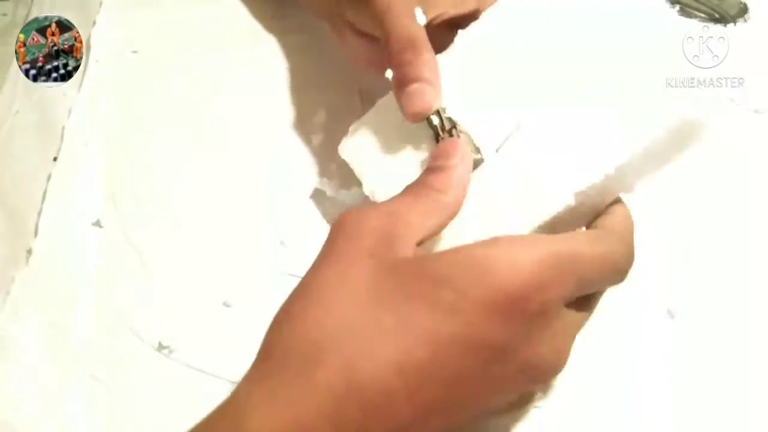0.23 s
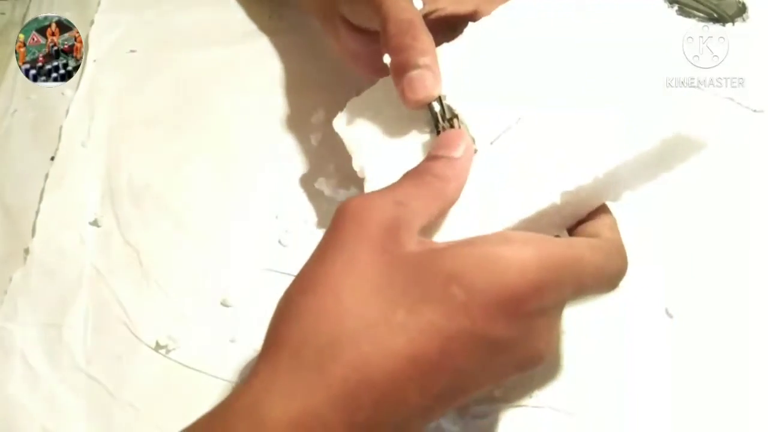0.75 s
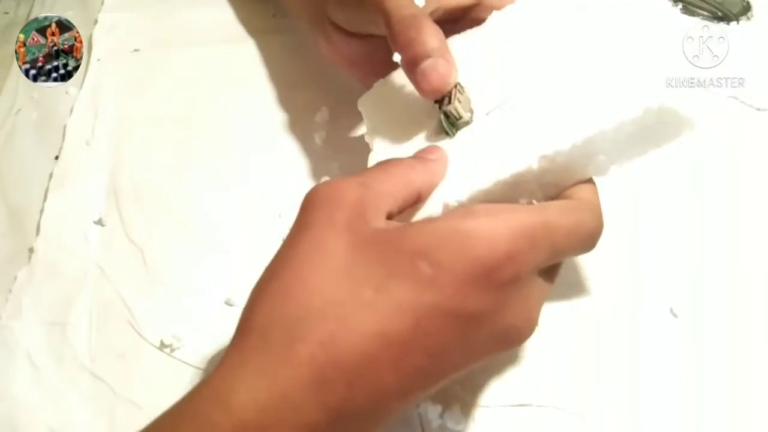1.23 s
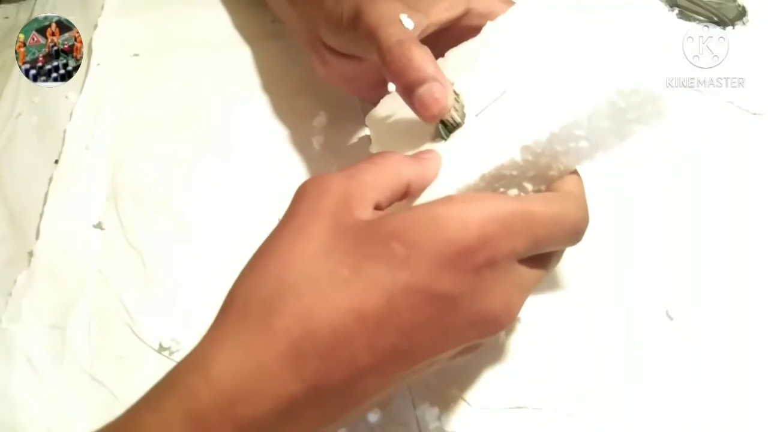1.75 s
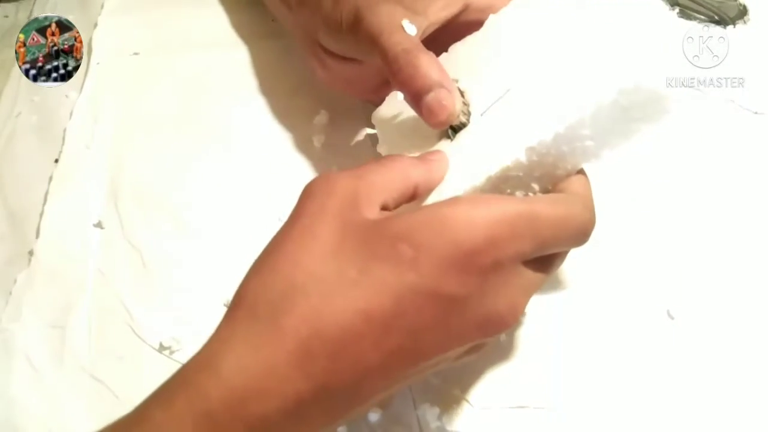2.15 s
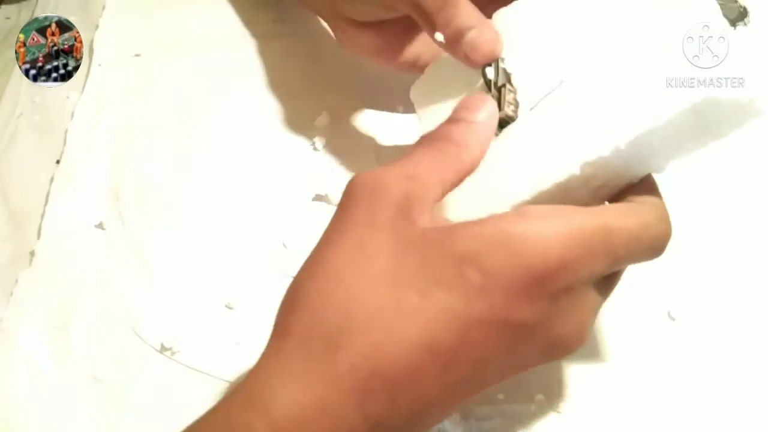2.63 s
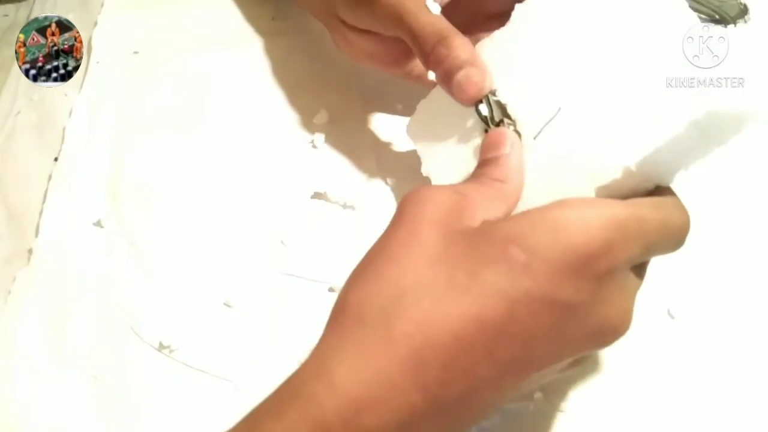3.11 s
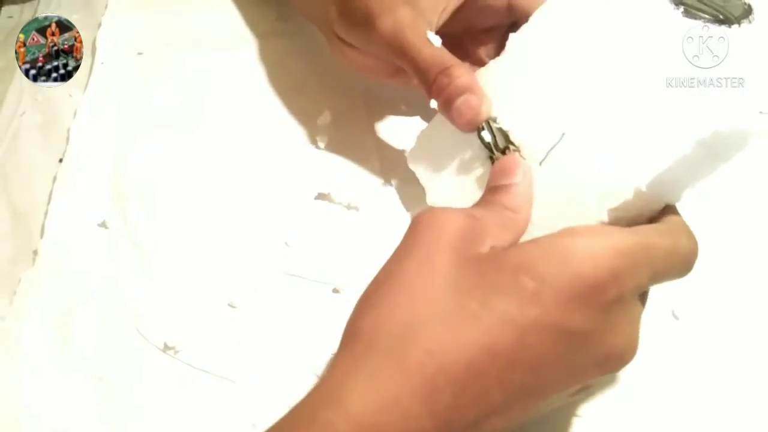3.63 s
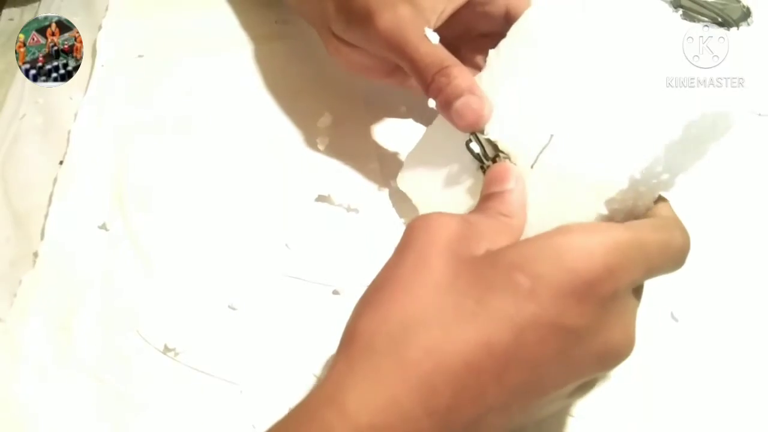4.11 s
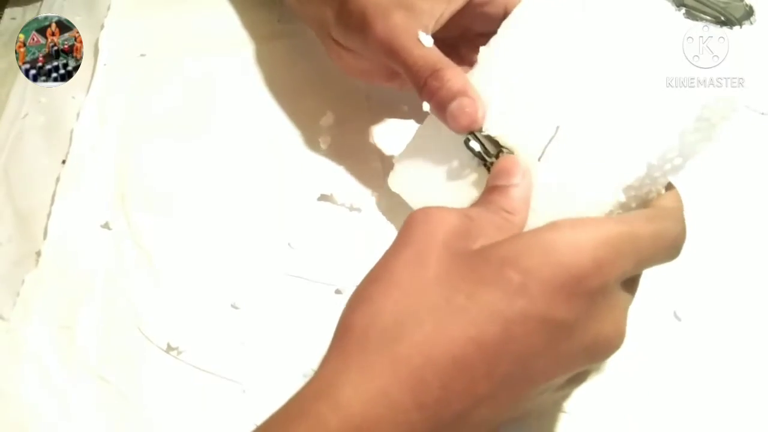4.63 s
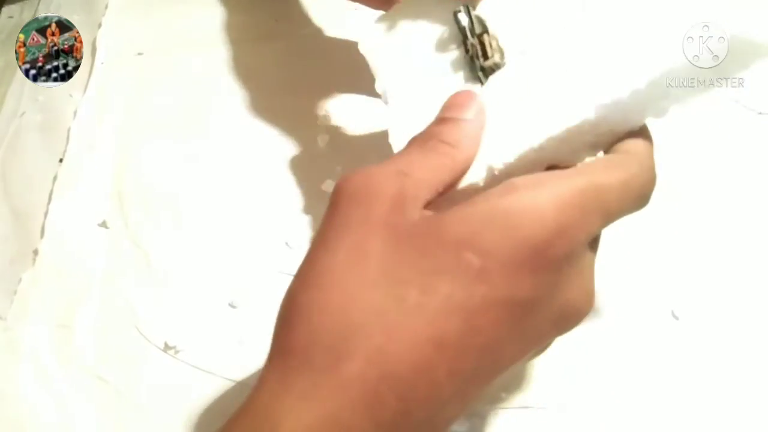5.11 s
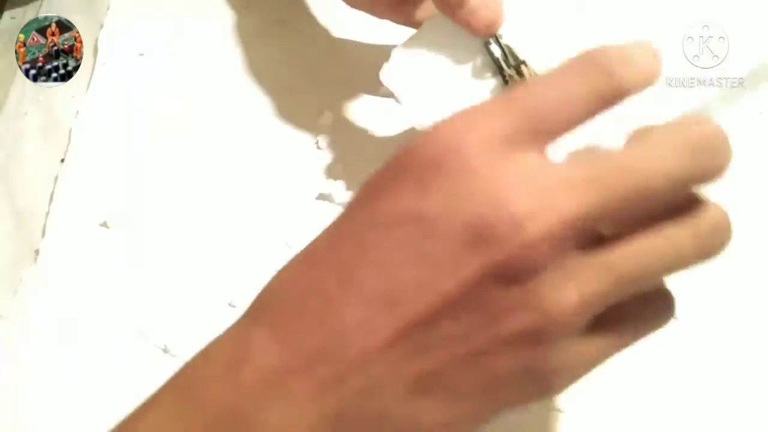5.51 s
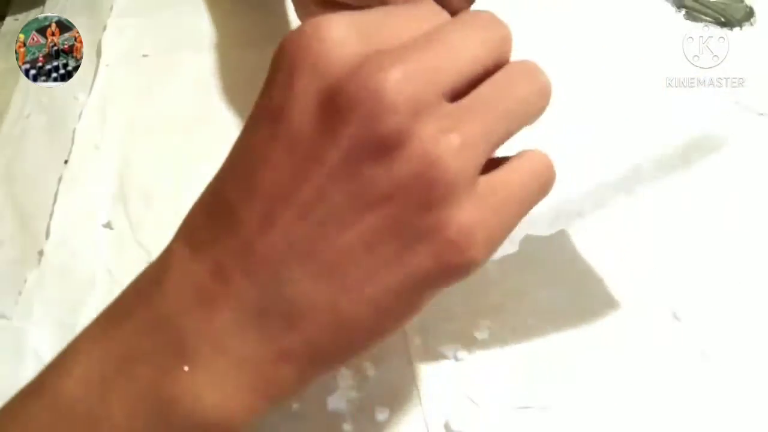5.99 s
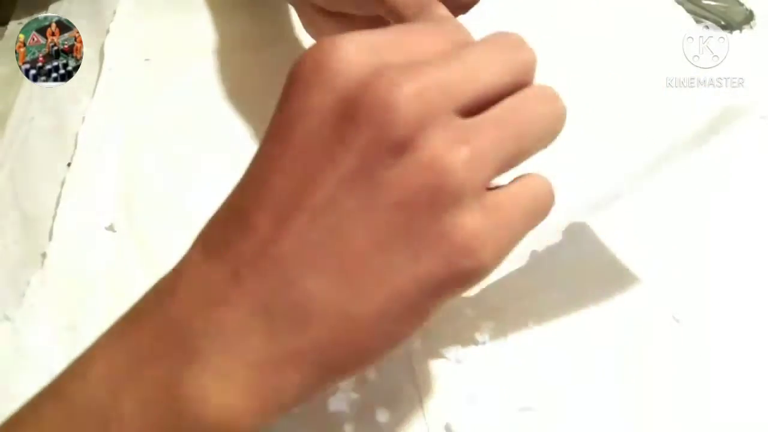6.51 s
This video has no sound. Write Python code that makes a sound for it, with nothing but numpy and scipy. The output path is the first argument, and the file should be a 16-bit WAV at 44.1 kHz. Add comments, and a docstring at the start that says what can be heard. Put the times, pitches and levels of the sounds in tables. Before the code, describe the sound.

Polystyrene foam is scraped and cut close to a stereo microphone in a small room. Quiet gritty rubs open, then a cluster of sharp cracks under one second. The loudest snap comes near one and a half seconds, with more cracks and a thin, broken, falling squeal. Afterwards come a stuttering judder, sparse soft scrapes, hollow rubs and one firmer scratch at the end, over low rumble and faint hiss.

```python
"""Polystyrene foam, scraped and cut with a blade, close to a microphone with two ports.
Each stroke is a rush of tiny cell ruptures that swells, eases off and leaves a trail of crumbs; at times it judders.
Whole beads snap as sharp cracks, and the slab rings hollow as filtered rubbing noise.
The foam squeals in spurts of one sinking tone; faint, fuzzy falling squeaks come now and then.
Behind it, a small room adds a short tail of noise, over a low rumble and a thin hiss of shaped noise."""
import sys
import numpy as np
from scipy import signal
from scipy.fft import rfft, irfft
from scipy.io import wavfile
from scipy.ndimage import uniform_filter1d

SR = 44100
rng = np.random.default_rng(int(sys.argv[2]) if len(sys.argv) > 2 else 0)


def put_to_file(sound):
    """Save the sound as 16-bit audio at rate SR, in the file named by the first command-line argument."""
    columns = np.atleast_2d(sound).T  # one column per channel
    safe = np.clip(columns, -1, 1)
    whole_steps = np.round(safe * 32767)
    wavfile.write(sys.argv[1], SR, whole_steps.astype(np.int16))


N = 297675

# Colour of the room rumble: (frequency [Hz], relative level [dB])
RUMBLE_COLOUR = [(26, -39), (61, -23.5), (81, -14), (96, 4.5), (132, -10.5), (192, -4), (252, 1.5),
                 (335, -5), (610, -15.5), (1020, -15), (1400, -35), (3400, -35), (5900, -48.5)]
# Colour of the thin hiss: (frequency [Hz], relative level [dB])
HISS_COLOUR = [(2500, -13.5), (3700, -15.5), (4500, -2.5), (6200, -6.5), (7500, 7), (8200, -4),
               (9300, -20.5), (11000, -47.5), (15000, -69)]
# Faint squeaks sliding down toward one resting pitch: (start [s], length [s], level [dB], first pitch [Hz])
CHIRPS = [(.935, .075, -62, 3050), (1.06, .11, -69, 3100), (2.45, .07, -66, 3300), (2.595, .055, -63, 3050),
          (3.79, .13, -60, 4400), (4.395, .075, -58, 3300), (6.47, .08, -70, 3200)]
# Spurts of stick-slip squeal: (start [s], end [s], level [dB])
SQUEAL_SPURTS = [(1.195, 1.34, -65), (1.328, 1.47, -51), (1.49, 1.632, -50), (1.645, 1.765, -51),
                 (1.765, 1.815, -61), (1.81, 1.89, -53)]
# Squeal pitch, dropping quickly at first, then sinking unevenly: (time [s], pitch [Hz])
SQUEAL_PITCH = [(1.195, 6000), (1.225, 5500), (1.25, 5410), (1.33, 5340), (1.42, 5150), (1.52, 5110),
                (1.7, 4860), (1.81, 4530), (1.9, 4450)]
# Hollow rings of the slab: (crest [s], length [s], level [dB], pitch [Hz])
HOLLOWS = [(0.06, 0.16, -62.5, 1063), (0.036, 0.095, -59, 2780), (1.493, 0.097, -56.5, 260),
           (1.68, 0.076, -59.5, 245), (2.148, 0.069, -60, 270.6), (2.5, 0.09, -62.5, 1024),
           (4.475, 0.051, -52, 3920), (3.115, 0.11, -59.5, 2222), (4.555, 0.083, -59, 962),
           (4.578, 0.087, -55, 2610), (4.722, 0.12, -58.5, 2700), (4.983, 0.19, -73.5, 980),
           (5.135, 0.13, -54, 1486), (5.138, 0.19, -64, 3970), (5.152, 0.12, -65, 654),
           (5.365, 0.074, -56.5, 187), (6.599, 0.091, -51, 1161), (6.594, 0.098, -57.5, 255.5)]
# Beads that snap: (time [s], relative level [dB], body [dB], left over right [dB])
BEADS = [(0.146, -47.5, 8, -3), (0.2118, -49, 4, -3), (0.269, -50, 3, -2.5), (.305, -52, 0, -2.5),
         (0.644, -23.5, -5, -2), (0.687, -40, 2, 1), (0.713, -38, 6, -5), (0.7894, -23.5, 6, -13),
         (0.803, -30, -16, 3.5), (0.814, -25, -3, -10), (0.854, -22.5, -10.5, -10), (1.206, -54, 2, -1.5),
         (1.343, -46, 6, -2.5), (1.4249, -10.5, 2.5, 4), (1.487, -28.5, -9, -2.5), (1.539, -22.5, -13, -5),
         (1.5986, -17.5, -6.5, -3.5), (1.678, -17.5, -3.5, -2), (1.8192, -40, 7, -11),
         (1.857, -24.5, -9, -3), (1.8788, -20.5, -10, -4), (1.9023, -26.5, -2.5, -5),
         (2.159, -28.5, -7, -1.5), (3.381, -44, -6.5, -3), (3.409, -47, -10, -4.5), (3.4463, -42, -5.5, -3),
         (3.787, -44, 8, -5.5), (3.858, -48, 0.5, -16), (3.972, -52.5, 5, -1), (4.127, -47, 8, -4.5),
         (4.434, -43, -3, -7.5), (4.494, -47, 16, -2), (4.543, -51, 16, -4), (4.579, -43, 9, -18),
         (5.11, -39, 6, -3.5), (4.777, -35.5, -46, -10), (5.7923, -41, -5.5, -7)]
# Colour of a snap: (frequency [Hz], relative level [dB])
SNAP_COLOUR = [(62, -56), (250, -18), (560, -10.5), (1100, -2.5), (1500, 4), (2100, -2), (2850, 1.5),
               (5000, 8.5), (6600, 3.5), (7900, -3), (9200, -11.5), (14400, -12.5), (15900, -25)]
# Strokes: (start [s], length [s], relative level [dB], hollow body [dB], bright edge [dB], left over right [dB])
STROKES = [(0.02, 0.054, -41, 7.5, -0.5, -4.5), (0.113, 0.072, -55.5, 14, 2.5, -1.5),
           (0.183, 0.087, -57.5, 13, 4, -3.5), (0.508, 0.045, -51.5, 15.5, -1, -6),
           (0.568, 0.025, -46, 6.5, -1, -2), (0.597, 0.058, -38, 9.5, 3, -4),
           (0.677, 0.039, -32.5, 1.5, -8, -2.5), (0.739, 0.031, -45, 21, 15, -10),
           (0.791, 0.084, -33, 1, -4.5, -2), (0.841, 0.026, -32.5, -2, 2.5, -4),
           (1.014, 0.05, -45, 5, 1.5, -3), (1.22, .2, -63, 10, -2, -3.5), (1.456, 0.045, -36, -2.5, 6, -2),
           (1.56, .032, -40, -7, 3, -2.5), (1.808, 0.021, -42, 2.5, -5, -2.5),
           (1.833, 0.072, -38.5, 6.5, 4.5, -4.5), (1.976, 0.052, -48.5, -4.5, 6, -3.5),
           (2.09, 0.036, -45, -0.5, -8, -4), (2.132, 0.037, -36.5, 4.5, 5, -2.5),
           (2.288, 0.036, -47.5, 21, 3, -2), (2.474, 0.1, -48.5, 6.5, -6.5, -2.5),
           (3.052, 0.11, -52.5, 9, -3, -2.5), (3.373, 0.1, -56.5, -9.5, -2, -0.5),
           (3.68, 0.038, -43, 0, -1, -2), (3.711, 0.11, -57, 17, -4, -8.5),
           (3.814, 0.11, -54.5, 5.5, -2.5, -3.5), (4.36, 0.033, -52, 20.5, 5, -3),
           (4.441, 0.066, -41, 2.5, -10.5, -3), (4.524, 0.07, -48, 18, 8.5, -2.5),
           (4.585, 0.0916, -60, 34, 8, -14), (4.665, 0.14, -50.5, 13, 1.5, -5),
           (4.771, 0.032, -47.5, 21, 22, -12), (4.898, 0.12, -63.5, 20, 7, -3.5),
           (5.013, 0.056, -50, 9, 3.5, -4.5), (5.073, 0.077, -44.5, 11, -2.5, -3.5),
           (5.116, 0.078, -52.5, 35, -9, -7.5), (5.194, 0.034, -52.5, 20, 16, -3.5),
           (5.529, 0.02, -49, -6, -0.5, -1.5), (5.752, 0.028, -55, 3, -6, -2.5),
           (6.323, 0.039, -47.5, 12.5, 2.5, -3.5), (6.352, 0.016, -39, -24.5, -5.5, -2.5),
           (6.554, 0.062, -34, -1, -4.5, -3)]
# Colour of a stroke: (frequency [Hz], relative level [dB])
STROKE_COLOUR = [(62, -19), (135, -15), (265, -6.5), (460, -11), (720, -13.5), (1000, -11), (1850, 0),
                 (2750, -3.5), (4700, 2), (6900, -2), (8100, -4.5), (9400, -19), (14400, -26.5),
                 (15900, -50.5)]
# The foam catches and chatters: (start [s], end [s], time between slips [s], relative level of first slip [dB])
JUDDERS = [(2.656, 2.70, 0.028, -32.5), (2.741, 2.83, 0.034, -41.5), (2.853, 2.9, .032, -47),
           (2.928, 2.985, 0.036, -42)]
# Slab resonances and dips in strokes and snaps: (frequency [Hz], width [Hz], lift [dB])
SLAB_MODES = [(1043.5, 76.5, 7.5), (2730, 190, 6), (3053, 67, -6.5), (3302, 200, 4.5), (4060, 600, 1),
              (4250, 280, -1)]
# Phase between the microphone ports: (frequency [Hz], lead of left [rad])
PORT_PHASE = [(110, -1), (400, 1), (900, 1.11), (1250, -0.5), (1900, -2.5), (2600, 0.5), (4500, 0.1),
              (8000, -1.86)]
# How alike the ports hear a rupture: (frequency [Hz], likeness [0 to 1])
PORT_LIKENESS = [(110, 0.45), (1100, 0.96), (1800, 0.86), (2400, 0.13), (3600, 0.16), (7100, 0.083),
                 (14000, .2)]
# How strongly the left-right difference shows: (frequency [Hz], factor on its dB [ratio])
PORT_SHADOW = [(110, 3), (720, 1.03), (1450, 0), (2600, 3.5), (4600, 3), (7100, 1.24), (10500, 0)]

# Pan of the ticks, slips and tears, before the port shadow
LOOSE_PAN_DB = -2
# Loose crumbs tick at random during strokes above TICK_DB
TICKS_PER_S, TICK_DB, TICK_SPREAD_DB, TICK_BODY_DB = 40, -52, 2.2, -3
# Softer beads crumble, then turn dull: thresholds in dB, slopes in dB per dB below them
CRISP_DB, CRUMBLE_SLOPE = -16, 0.55
BRIGHT_DB, DULLING_SLOPE = -28.5, 0.36
# Snaps above TEAR_ABOVE_DB are wrapped in a bright fizz, its level given against the snap's table level
TEAR_ABOVE_DB, TEAR_LEAD_S, TEAR_S = -23.5, 0.025, 0.068
TEAR_DB, TEAR_BODY_DB, TEAR_EDGE_DB = -31.5, 12, 13
# Later slips of a judder share CHATTER_DB
SLIP_S, CHATTER_DB, SLIP_BODY_DB, SLIP_EDGE_DB = 0.018, -47.5, -3, -9.5
# Every stroke bites, swells to its middle and lets go over shares of its length
BITE_SHARE, ARCH_DB, RELEASE_SHARE = 0.14, 11, 0.26
# Crumbs rustle before and after it
CRUMBS_DB, CRUMBS_LEAD_S, CRUMBS_TRAIL_S = -24, 0.019, 0.06
# Strokes lighter than DENSE_DB tear fewer cells and sound grittier (slope in dB per dB)
DENSE_DB, THINNING_SLOPE = -44, 0.55


def amp(db):
    """Decibels to gain."""
    return 10 ** (np.asarray(db) / 20)


def unit(x):
    """Scales to rms 1."""
    return x / np.sqrt(np.mean(x ** 2) + 1e-20)


def read(points, hz):
    """Joins points on a log-frequency axis."""
    f, value = np.transpose(points)
    return np.interp(np.log(hz + 1), np.log(f + 1), value)


def pan(db):
    """Left and right gains, db apart."""
    return amp([[db / 2], [-db / 2]])


def add(mix, s, sound):
    """Mixes a stereo sound in at time s."""
    start = round(s * SR)
    part = mix[:, max(start, 0):max(start + sound.shape[1], 0)]
    part += sound[:, max(-start, 0):][:, :part.shape[1]]


def shelf(hz, corner_hz, order=4):
    """Rises from 0 below the corner to 1 above it."""
    return 1 - 1 / (1 + (hz / corner_hz) ** order)


def wobble(seconds):
    """Random drift of rms 1 that changes over about the given time."""
    pole = np.exp(-1 / (seconds * SR))
    return unit(signal.lfilter([1], [1, -pole], rng.standard_normal(N)))


def causal(db, size=4096):
    """Minimum-phase spectrum with the given gain."""
    cepstrum = irfft(np.log(amp(db)))
    cepstrum[1:size // 2] *= 2
    cepstrum[size // 2 + 1:] = 0
    return np.exp(rfft(cepstrum))


def evened(spectrum, width_hz=450):
    """Levels out broad humps and holes, keeping the fine ripple."""
    bins = max(round(width_hz * 2 * len(spectrum) / SR), 1)
    power = uniform_filter1d(abs(spectrum) ** 2, bins)
    return spectrum * causal(-10 * np.log10(power + 1e-9))


def steady(colour, db, likeness, pan_db):
    """Even noise, partly shared by both ports."""
    shared, left, right = rng.standard_normal((3, N))
    noise = np.sqrt(likeness) * shared + np.sqrt(1 - likeness) * np.array([left, right])
    gain = amp(read(colour, np.fft.rfftfreq(N, 1 / SR)))
    shaped = irfft(rfft(noise) * gain, N)
    return amp(db) * unit(shaped) * pan(pan_db)


def rumble():
    """Low room noise that reaches both ports much alike."""
    return steady(RUMBLE_COLOUR, db=-68.5, likeness=0.72, pan_db=-3)


def hiss():
    """Thin high noise, nearly independent in the two ports."""
    return steady(HISS_COLOUR, db=-64.5, likeness=0.024, pan_db=-2.5)


def room(near, t60=0.16, wet_db=-17, build_s=0.004):
    """Short tail of a small room: noise that builds up, then decays by 60 dB in t60 seconds."""
    t = np.arange(SR // 2) / SR
    decay = np.exp(-np.log(1000) * t / t60)
    tail = rng.standard_normal((2, len(t))) * decay * (1 - np.exp(-t / build_s))
    tail /= np.linalg.norm(tail, axis=1, keepdims=True)
    return amp(wet_db) * signal.fftconvolve(near, tail, axes=1)[:, :N]


def chirps(rest_hz=2520, glide_share=0.4, jitter=0.048, flutter_db=2.5, pan_db=-4):
    """Faint, fuzzy squeaks now and then: jittered tones that stutter, slide downward and level off."""
    out, waver = np.zeros((2, N)), wobble(0.0004)
    flutter = amp(flutter_db * unit(uniform_filter1d(wobble(0.004), 60)))
    for s, length, db, top_hz in CHIRPS:
        at = np.arange(round(s * SR), round((s + length) * SR))
        u = np.linspace(0, 1, len(at))
        glide = rest_hz + (top_hz - rest_hz) * np.exp(-u / glide_share)
        tone = np.sin(2 * np.pi * np.cumsum(glide * (1 + jitter * waver[at])) / SR)
        out[:, at] += amp(db) * np.sin(np.pi * u) * flutter[at] * tone * pan(pan_db)
    return out


def squeal(pan_db=-6, left_lead_rad=-1.2, fade_s=0.0098):
    """Fast stick-slip: one thin, unsteady tone that sinks as the stroke slows."""
    t = np.arange(N) / SR
    hz = np.interp(t, *np.transpose(SQUEAL_PITCH))
    waver = 0.009 * wobble(0.0007)
    flutter_db = 3.2 * uniform_filter1d(wobble(0.004), 60)
    phase = 2 * np.pi * np.cumsum(hz * (1 + waver)) / SR
    level = np.zeros(N)
    for start, end, db in SQUEAL_SPURTS:
        fade = np.clip(np.minimum(t - start, end - t) / fade_s, 0, 1)
        level += amp(db + flutter_db) * fade
    return np.sqrt(2) * level * np.sin([phase + left_lead_rad, phase]) * pan(pan_db)


def swell(crest, rise, fall, edge_db=12):
    """The samples around a crest, and a bell that is edge_db down at -rise and +fall."""
    at = np.arange(max(round((crest - 2 * rise) * SR), 0), min(round((crest + 2 * fall) * SR), N))
    t = at / SR - crest
    return at, amp(-edge_db * (t / np.where(t < 0, rise, fall)) ** 2)


def hollows(pan_db=-5, grain_db=2.5, grain_s=0.006, wander=0.012, wander_s=0.03):
    """Uneven rubbing noise drives one broad, wandering resonance of the slab; higher ones are wider."""
    out, drift = np.zeros((2, N)), wobble(wander_s)
    rubbing = rng.standard_normal(N) * amp(grain_db * wobble(grain_s))
    for crest, length, db, hz in HOLLOWS:
        at, bell = swell(crest, rise=0.44 * length, fall=0.56 * length)
        width_hz = 120 + 0.029 * hz
        pole = np.exp(-np.pi * width_hz / SR)
        # shift the noise down, low-pass it twice and shift it back: a resonance whose pitch can move
        turn = np.exp(2j * np.pi * np.cumsum(hz * (1 + wander * drift[at])) / SR)
        ring = (turn * signal.lfilter([1], np.poly([pole, pole]), rubbing[at] / turn)).real
        out[:, at] += amp(db) * unit(ring * bell) * np.sqrt(np.mean(bell ** 2)) * pan(pan_db)
    return out


def foam(db_of, pan_db, ring_s, ring_db, crack=(1,), size=4096):
    """What both ports hear of one rupture: a broad crack and a brief dense ring, new at each call."""
    t, hz = np.arange(size) / SR, np.fft.rfftfreq(size, 1 / SR)
    ring = rng.standard_normal((2, size)) * np.exp(-t / ring_s)
    right, other = rfft(ring / np.linalg.norm(ring, axis=1, keepdims=True))
    right = (1 + amp(ring_db) * right) / np.hypot(1, amp(ring_db))
    same = read(PORT_LIKENESS, hz)
    left = same * right + np.sqrt(1 - same ** 2) * other
    left, right = (evened(port * rfft(crack, size)) for port in (left, right))
    left = left * np.exp(1j * read(PORT_PHASE, hz))
    side_db = pan_db * read(PORT_SHADOW, hz) / 2
    slab_db = sum(lift / (1 + (2 * (hz - f) / width) ** 2) for f, width, lift in SLAB_MODES)
    ports = np.array([left * amp(side_db), right * amp(-side_db)])
    response = irfft(ports * causal(db_of(hz) + slab_db))
    # a millisecond of delay leaves room for one port to hear it before the other
    response = np.roll(response, SR // 1000, axis=1)[:, :size // 2]
    return response / np.sqrt(np.sum(response ** 2) / 2)


def ticks(count=400):
    """Loose crumbs break at random times under the firmer strokes, as tiny snaps."""
    when, chance, size = rng.random((count, 3)).T
    when = when * N / SR
    firm = [(s, length) for s, length, db, *_ in STROKES if db > TICK_DB]
    rubbed = np.any([(when > s) & (when < s + length) for s, length in firm], axis=0)
    heard = rubbed & (chance * count * SR / N < TICKS_PER_S)
    return [(s, TICK_DB - TICK_SPREAD_DB * np.log(u), TICK_BODY_DB, LOOSE_PAN_DB)
            for s, u in zip(when[heard], size[heard])]


def snaps(gain_db=17.5, start_s=0.0006, run_s=0.0022, run_db=-1.5, size=800):
    """A bead starts to split and gives way, and the crack runs on through its neighbours."""
    out, t = np.zeros((2, N)), (np.arange(size) - size // 4) / SR
    for s, db, body_db, pan_db in list(BEADS) + ticks():
        # cubed noise is sparse and spiky
        run = rng.standard_normal(size) ** 3 * np.exp(np.minimum(t / start_s, -t / run_s))
        crumble_db = CRUMBLE_SLOPE * max(CRISP_DB - db, 0)
        crack = (t == 0) + run * amp(run_db + crumble_db) / np.linalg.norm(run)
        dull_db = DULLING_SLOPE * max(BRIGHT_DB - db, 0)

        def colour(hz):
            body = body_db * (1 - shelf(hz, 2300))
            return read(SNAP_COLOUR, hz) + body - dull_db * shelf(hz, 4600)

        response = foam(colour, pan_db, ring_s=0.0032, ring_db=0.5, crack=crack)
        add(out, s + t[0], amp(db + gain_db) * response)
    return out


def tears():
    """The fizz around each hard snap, as a bright stroke that starts ahead of it."""
    return [(s - TEAR_LEAD_S, TEAR_S, db + TEAR_DB, TEAR_BODY_DB, TEAR_EDGE_DB, LOOSE_PAN_DB)
            for s, db, *_ in BEADS if db > TEAR_ABOVE_DB]


def slips():
    """The jerks of each judder, as very short strokes: one jump, then weaker chatter."""
    jerks = []
    for start, end, period, first_db in JUDDERS:
        for k, s in enumerate(np.arange(start, end, period)):
            db = CHATTER_DB if k else first_db
            jerks.append((s, SLIP_S, db, SLIP_BODY_DB, SLIP_EDGE_DB, LOOSE_PAN_DB))
    return jerks


def pressure(start, length):
    """The samples of one stroke and its force: bite, arch and release, within a faint rustle of crumbs."""
    first = max(round((start - 4 * CRUMBS_LEAD_S) * SR), 0)
    last = min(round((start + 2 * length + 4 * CRUMBS_TRAIL_S) * SR), N)
    at = np.arange(first, last)
    t = at / SR - start
    before, after = np.maximum(-t, 0), np.maximum(t - length, 0)
    bite = np.clip(t / (BITE_SHARE * length), 0, 1)
    arch = amp(-ARCH_DB * (2 * np.clip(t / length, 0, 1) - 1) ** 2)
    rub = bite * arch * np.exp(-after / (RELEASE_SHARE * length))
    crumbs = amp(CRUMBS_DB) * np.exp(-before / CRUMBS_LEAD_S - after / CRUMBS_TRAIL_S)
    return at, np.hypot(rub, crumbs)


def scrapes(cells_per_s=6500, spread_db=1.0, judder_db=2.0, judder_s=0.001,
            grip_db=1.8, grip_s=0.004, gain_db=-0.5):
    """Each stroke is a dense run of random cell ruptures, in clumps, as the foam catches and slips."""
    out = np.zeros((2, N))
    size_db = spread_db * np.minimum(rng.exponential(1, N), 4)
    size_db += judder_db * wobble(judder_s) + grip_db * wobble(grip_s)
    ruptured = rng.random(N) < cells_per_s / SR
    cells = unit(amp(size_db) * rng.choice([-1, 1], N) * ruptured)
    chance = rng.random(N)
    for s, length, db, body_db, edge_db, pan_db in list(STROKES) + slips() + tears():
        at, force = pressure(s, length)
        density = min(amp(THINNING_SLOPE * (db - DENSE_DB)), 1)
        # fewer cells, each stronger, keep the level
        force = force * (chance[at] < density) / np.sqrt(density)

        def colour(hz):
            body = body_db * (1 - shelf(hz, 2200))
            return read(STROKE_COLOUR, hz) + body + edge_db * shelf(hz, 4310, order=8)

        response = foam(colour, pan_db, ring_s=0.0026, ring_db=1.0)
        torn = amp(db + gain_db) * force * cells[at]
        add(out, at[0] / SR, signal.fftconvolve(torn[None], response, axes=1))
    return out


def scene():
    """The foam and the squeaks in their room, over rumble and hiss."""
    near = chirps() + squeal() + hollows() + snaps() + scrapes()
    return rumble() + hiss() + room(near) + near


def record(dry):
    """The microphone drops the deepest bass; then a steep band limit removes the top."""
    bass_cut = signal.butter(3, 70, "highpass", fs=SR, output="sos")
    thin = signal.sosfilt(bass_cut, dry)
    band_limit = signal.firwin(511, 15900, window=("kaiser", 9), fs=SR)
    return signal.oaconvolve(thin, band_limit[None], "same")


dry = scene()
out = record(dry)
put_to_file(out)
```